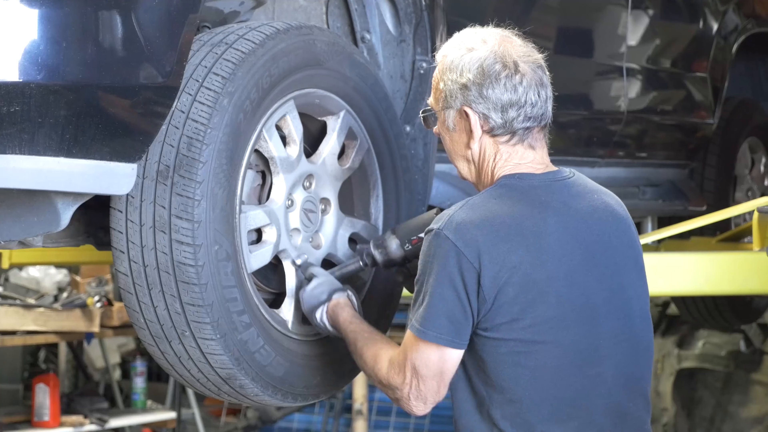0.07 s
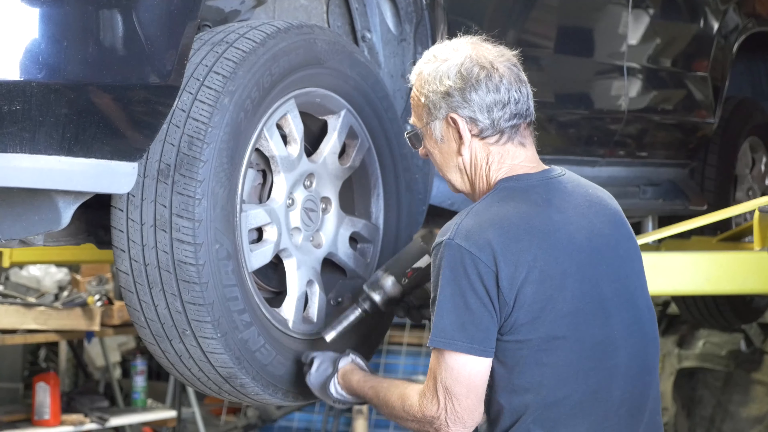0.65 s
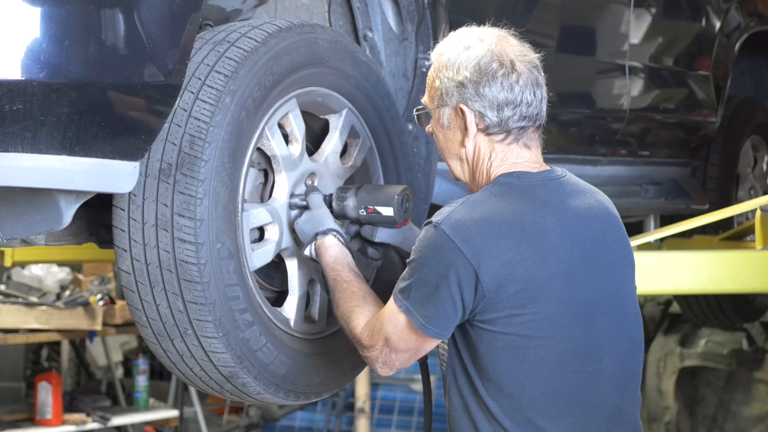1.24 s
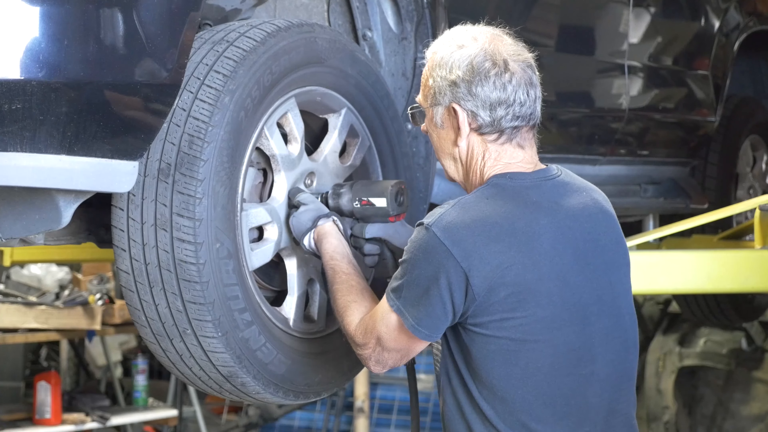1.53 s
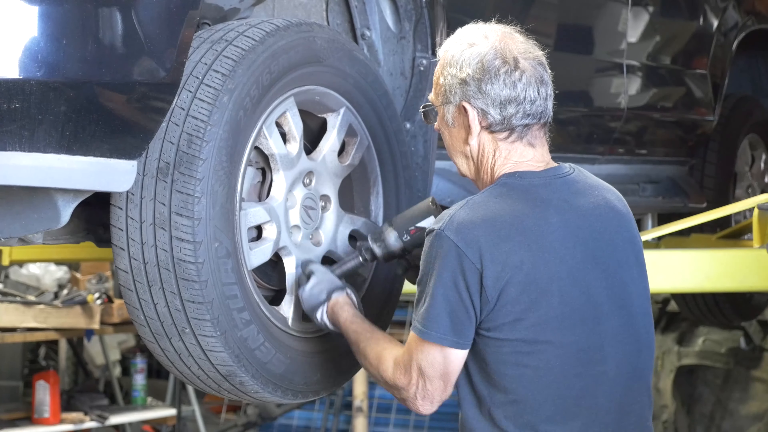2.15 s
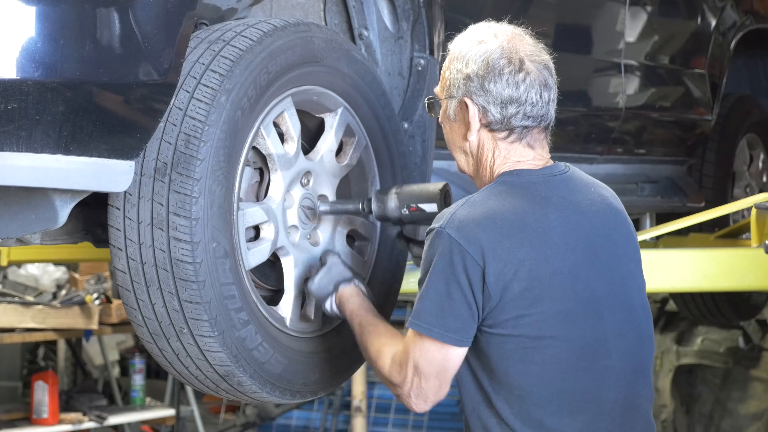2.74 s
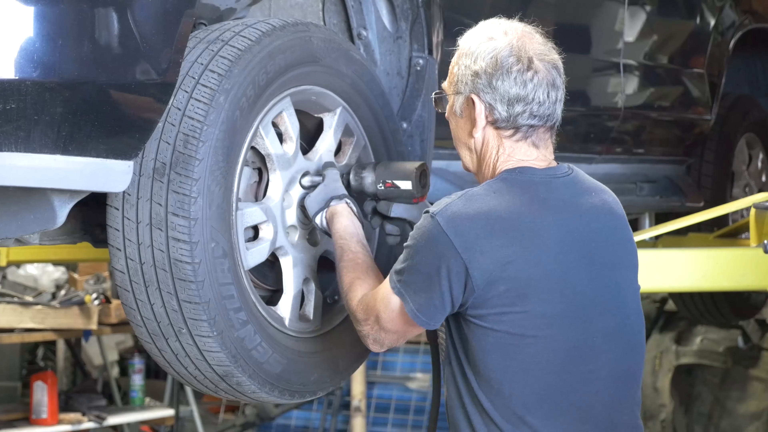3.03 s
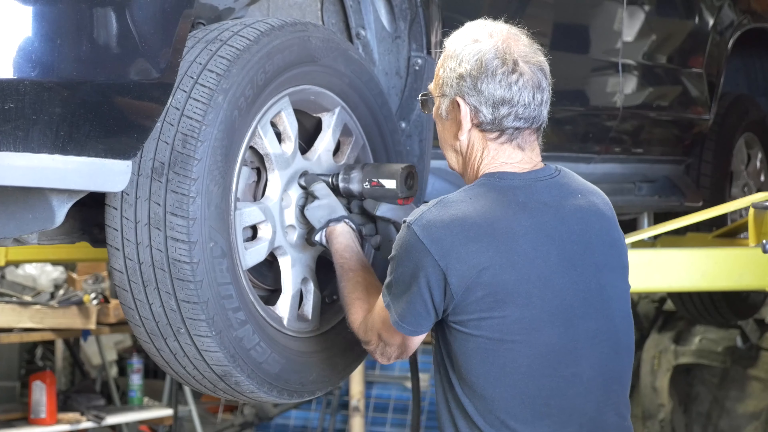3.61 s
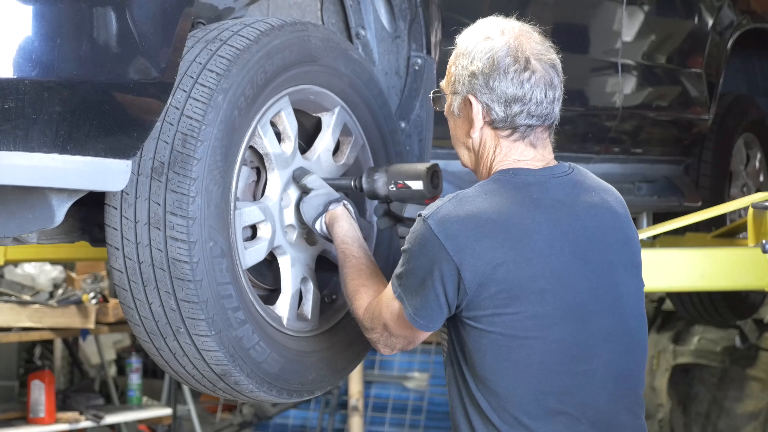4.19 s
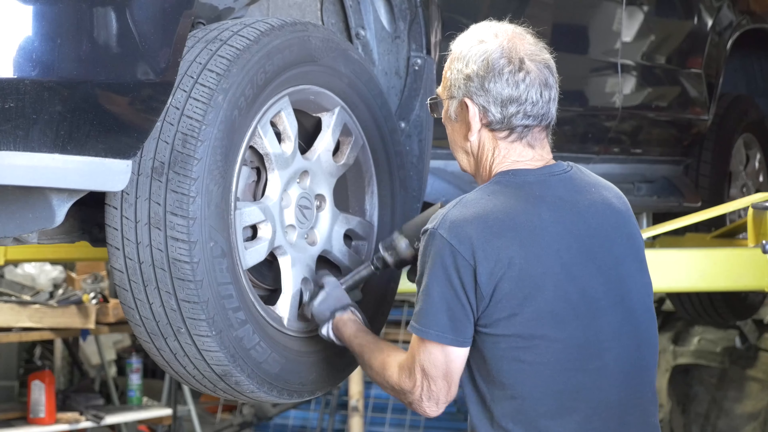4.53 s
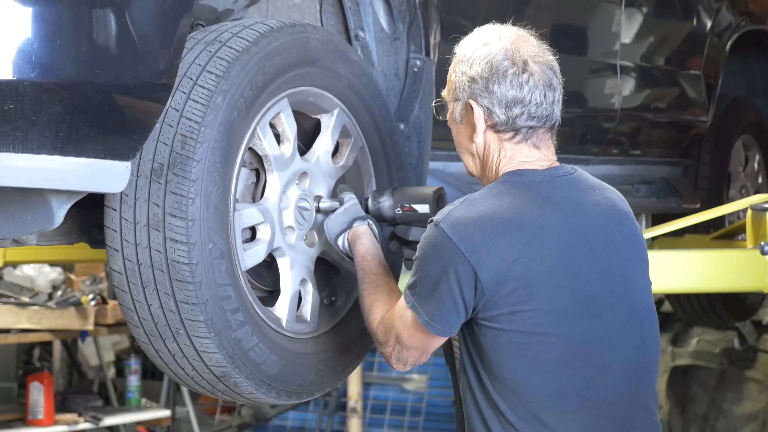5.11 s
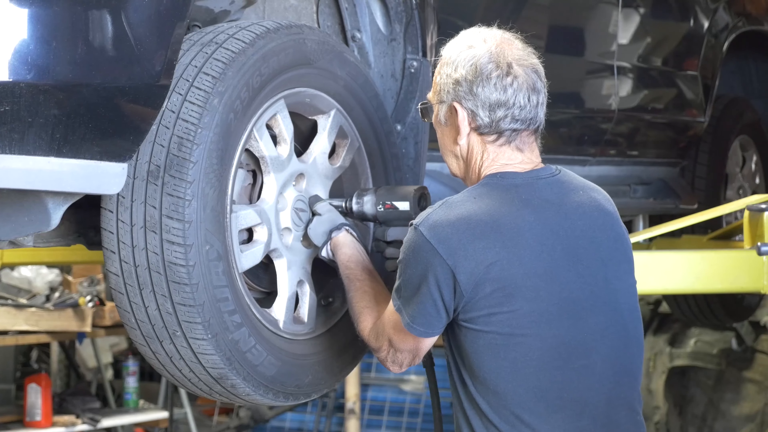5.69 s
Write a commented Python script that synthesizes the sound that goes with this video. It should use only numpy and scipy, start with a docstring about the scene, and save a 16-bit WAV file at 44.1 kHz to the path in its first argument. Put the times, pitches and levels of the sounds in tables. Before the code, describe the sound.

An air impact wrench loosens three lug nuts in short hammering bursts, whining up and winding down, with metal clanks over a low workshop hum.

```python
"""An air impact wrench takes lug nuts off a car wheel in a humming workshop, close to one microphone.
First the six-vane motor coasts down, rattling once a turn, and a loose nut clinks. Then, three times,
the socket clanks onto a nut, the hammer's impacts break it free, and the unloaded motor whines up
in a rush of exhaust air. After the first two nuts the pitch sinks again and the socket chatters;
after the third the sound ends just past top speed."""
import sys
import numpy as np
from scipy import signal
from scipy.fft import rfft, irfft, next_fast_len
from scipy.io import wavfile
from scipy.ndimage import uniform_filter1d, map_coordinates

SR = 44100
rng = np.random.default_rng(int(sys.argv[2]) if len(sys.argv) > 2 else 0)


def master(y):
    """Save y as 16-bit WAV."""
    cut = np.clip(np.atleast_2d(y).T, -1, 1)
    pcm = np.round(cut * 32767)  # scale
    wavfile.write(sys.argv[1], SR, pcm.astype(np.int16))


N = 262395
T = np.arange(N) / SR
VANES, BLOW_COUNT = 6, 14


# motor speed, one curve a run: (time [s], vane rate [Hz])
SPEED_CURVES = [
    [(0, 412.6), (.05, 366.3), (.1, 329.7), (.2, 264.5), (.32, 211.2), (.4, 171.8), (.57, 107.8),
     (.75, 70.26), (1.09, 52.15)],
    [(1.44, 293), (1.6, 355), (1.66, 520.6), (1.75, 683), (1.795, 704), (1.85, 619.4), (1.9, 498),
     (1.95, 408.3), (2.0, 343.3), (2.19, 208.2), (2.5, 118.7), (2.95, 57.94)],
    [(3.72, 291.2), (3.88, 321), (3.97, 544), (4.045, 669), (4.11, 604), (4.2, 463.5), (4.31, 357.7),
     (4.5, 246.9), (4.8, 132.4), (5.24, 62.1)],
    [(5.525, 287), (5.685, 313), (5.76, 505.5), (5.85, 655), (5.905, 710), (5.95, 637)],
]
def rotor(jitter=0.0021, lock_s=0.012, free_s=0.013):
    """Phase is the integral of vane rate. The hammer loads the rotor (0-1) around each run of blows."""
    turning = sum(gate(run[0][0], run[-1][0], rise=0.0032, release=0.018) for run in SPEED_CURVES)
    hz = np.interp(T, *np.vstack(SPEED_CURVES).T)
    phase = 2 * np.pi * np.cumsum(hz * (1 + jitter * walk(180))) / SR
    load = sum(gate(first - lock_s, first + (BLOW_COUNT - 1) / rate, lock_s, free_s)
               for first, rate, *_ in BLOW_RUNS)
    return turning, hz, phase, load


# resonances of the exhaust port and of the housing: (frequency [Hz], gain [dB])
PORT_RESPONSE = [(120, -33.5), (240, -25.5), (385, -32), (480, -24), (590, -27.5), (690, -20.5),
                 (860, -16.5), (1010, -20.5), (1170, -11.5), (1300, -18.5), (1400, -28)]
HOUSING_RESPONSE = [(300, -17), (700, -7), (950, -1.5), (1150, 0), (1380, -8), (1650, -5.5), (2050, -13),
                    (2500, -8), (2900, -19.5), (3450, -12), (4300, -19.5), (7000, -5)]
# speed laws of harmonics 1-2 and of the rest: (level [dB], knee [Hz], slope [dB/octave])
WHINE_LAW = (0, 254, 14.5)
OVERTONE_LAW = (-21.8, 700, 8.6)
def whine(hz, phase, treble_knee_hz=3400):
    """Siren principle: one puff a vane makes a harmonic series, filtered by port and housing."""
    low_db = by_speed(WHINE_LAW, hz)
    upper_db = by_speed(OVERTONE_LAW, hz) + aim_db("overtones")
    out = undb(low_db + read(PORT_RESPONSE, hz)) * np.sin(phase)
    out += undb(low_db - 5 + read(PORT_RESPONSE, 2 * hz)) * partial(2 * phase)
    for k in range(3, 14):
        db = upper_db + read(HOUSING_RESPONSE, k * hz) - 2 * np.log2(k / 4) + 4 * walk(25)
        db -= 13 * np.maximum(np.log2(k * hz / treble_knee_hz), 0)  # the top sinks into the air noise
        out += undb(db) * partial(k * phase)
    return np.sqrt(2) * out


# pounding of a tight nut: (first blow [s], blow rate [Hz], crack [dB], thud [dB], treble [dB])
BLOW_RUNS = [(1.446, 90.5, -15, -20.5, -21), (3.731, 85, -13, -18.5, -21), (5.537, 93, -13.5, -20, -23)]
# spectra of a low thud, a blow's crack and the anvil's ring: (frequency [Hz], level [dB])
THUD_SPECTRUM = [(20, -26), (60, 1), (150, -4.5), (300, -5.5), (600, -15), (2000, -49)]
CRACK_SPECTRUM = [(100, 7.5), (400, 2), (820, 7.5), (1150, 1), (1700, 1), (2800, -0.5), (4500, -8.5),
                  (8000, -9), (16000, -23)]
ANVIL_SPECTRUM = [(3000, 6.5), (7000, -4), (9300, 2), (10600, 6), (11800, -6), (16000, -28)]
def hammer(jitter_s=0.0011, tight_db=3.5, yield_s=0.051, scatter_db=1.5):
    """Impulse excitation: each blow sets wheel and anvil ringing, hardest before the nut yields."""
    out, blows = np.zeros(N), []
    for first, rate, crack_db, thud_db, treble_db in BLOW_RUNS:
        since = np.arange(BLOW_COUNT) / rate
        late, force = rng.standard_normal((BLOW_COUNT, 2)).T
        times = first + since + jitter_s * late * (since > 0)
        hard_db = tight_db * np.exp(-since / yield_s)
        force_db = scatter_db * force
        blows.append(np.c_[times, crack_db + hard_db + force_db, thud_db + force_db,
                           treble_db + hard_db / 2])
        add(out, first, -undb(-2) * mode(1415, t60=0.016))  # the nut cracks free
    times, crack_db, thud_db, treble_db = np.vstack(blows).T
    out += bursts(times, thud_db, THUD_SPECTRUM, t60=0.045, rise=0.00021)
    out += bursts(times, crack_db, CRACK_SPECTRUM, t60=0.033, rise=0.00058)
    out += bursts(times, treble_db, ANVIL_SPECTRUM, t60=0.065, rise=0.00091)
    for at, wheel_db, anvil_db in zip(times, crack_db + 1, treble_db - 2):
        wheel_hz = 720 * np.exp(0.2 * rng.standard_normal())
        anvil_hz = 10500 * (1 + 0.05 * rng.standard_normal())  # loaded differently at each blow
        add(out, at, undb(wheel_db) * mode(wheel_hz, t60=0.013))
        add(out, at, undb(anvil_db) * mode(anvil_hz, t60=0.035))
    return out


# socket contacts, relative levels: (time [s], crack [dB], knock [dB], treble [dB], ring [dB])
CLANKS = [(1.133, -2, -30, -16, -43), (1.146, 4, -9.5, -11, -29), (1.17, -31, -45, -25, -32),
          (1.182, -25, -39, -25, -42), (2.212, -2, -39, -14.5, -40), (2.221, -9, -40, -15.5, -33),
          (2.97, -13, -24, -15, -17.5), (2.974, -4, -15, -18.5, -40), (3.003, 0, -17, -13.5, -20),
          (3.026, -5.5, -42, -38, -35), (3.038, 0, -17, -13.5, -22.5), (3.47, -17, -29, -44, -55),
          (3.501, -11, -30, -60, -62), (3.513, -1, -17.5, -18.5, -25), (3.517, -23, -10, -16, -33),
          (5.237, -9, -41, -37, -42), (5.249, 2.5, -4.5, -22, -31), (5.293, -13, -18.5, -42, -41),
          (5.346, -8.5, -12, -21, -48)]
# spectra of a contact's crack and treble: (frequency [Hz], level [dB])
CLANK_CRACK = [(60, -4), (300, 1.5), (750, 1.5), (1000, -2), (1300, 2), (1800, -3.5), (2400, -4.5),
               (3600, -13), (4800, -11.5), (7000, -42), (16000, -32)]
CLANK_TREBLE = [(2500, 2), (6000, -4), (7800, 0), (9500, 4), (12000, -5.5), (16000, -17)]
# modes of socket and wheel: (frequency [Hz], level [dB], t60 [s])
SOCKET_MODES = [(470, -8, .22), (1270, -3, .04), (1650, -14, .25), (2060, -11, .12), (2520, -11, .1),
                (3698, -18, .25), (4328, -15, .2), (4690, -10, .17), (7300, -9, .1), (8037, -10, .1),
                (9480, 0, .08), (10790, -10, .07)]
def socket_clanks():
    """Transient and free vibration: the socket hits a nut, the wheel knocks, the steel rings on."""
    times, crack_db, knock_db, treble_db, ring_db = np.transpose(CLANKS)
    out = bursts(times, crack_db - 12, CLANK_CRACK, t60=0.044, rise=0.00055)
    out += bursts(times, treble_db + 5.5, CLANK_TREBLE, t60=0.027, rise=0.0013)
    for at, wheel_db, steel_db in zip(times, knock_db + 2, ring_db - 3):
        add(out, at, undb(steel_db) * ring(SOCKET_MODES))
        add(out, at, undb(wheel_db) * mode(445.5, t60=0.045))
    return out


# spectra of the exhaust air: (frequency [Hz], level [dB])
RUSH_SPECTRUM = [(60, -24), (200, -12.5), (450, 5), (680, 0.5), (930, 1), (1300, 0.5), (1720, -3.5),
                 (2150, -1.5), (2600, -1), (3800, -13.5), (6000, -20), (16000, -25)]
HISS_SPECTRUM = [(1500, -6), (3400, 0), (4900, 2), (5800, 0.5), (7400, 4), (9500, 6.5), (11500, 2.5),
                 (13800, 4), (16000, -2.5)]
RASP_SPECTRUM = [(2500, -20), (4000, -1), (5500, -2), (7000, -7), (10000, -22)]
# their speed laws: (level [dB], knee [Hz], slope [dB/octave])
RUSH_LAW = (-24.5, 388, 7.16)
HISS_LAW = (-29, 220.5, 12)
RASP_LAW = (-32, 830, 12)
def exhaust(running, hz, phase, load, pulse_depth=0.17):
    """Amplitude modulation: air noise pulses with the vanes and turns rough near top speed."""
    hiss_db = by_speed(HISS_LAW, hz) + aim_db("hiss") - 3.5 * load
    rasp = undb(by_speed(RASP_LAW, hz) + 2 * walk(90)) * noise(RASP_SPECTRUM)
    rush = undb(rush_db(hz, load) + 2 * walk(70)) * noise(RUSH_SPECTRUM)
    hiss = undb(hiss_db + 1.76 * walk(90)) * noise(HISS_SPECTRUM)
    pulsing = 1 + pulse_depth * running * np.cos(phase)
    return pulsing * (rush + hiss + rasp)


def rush_db(hz, load):
    """Flow noise grows with speed; a rotor loaded by the hammer lets less air through."""
    return by_speed(RUSH_LAW, hz) + aim_db("rush") - 8 * load


# top bands of the exhaust hiss: (centre [Hz], level [dB])
SHEEN_BANDS = [(9100, -37), (13000, -42)]
# their speed law: (gain [dB], knee [Hz], slope [dB/octave])
SHEEN_LAW = (0, 213, 12.6)
def sheen(hz, edge_ratio=1.35):
    """Independent modulation: bands of hiss swell and sink as the tool moves, shifting the timbre."""
    out = 0
    for centre, db in SHEEN_BANDS:
        band = [(centre / edge_ratio, -25), (centre, 0), (centre * edge_ratio, -25)]
        out += undb(db + 2 * walk(3)) * noise(band)
    return undb(by_speed(SHEEN_LAW, hz)) * out


# spells of chatter, relative levels: (start [s], end [s], scrape [dB], ring pitch [Hz], tick [dB])
CHATTER_SPELLS = [(.284, 0.539, -8.5, 2150, -31), (2.024, 2.187, -12.5, 1900, -27.5),
                  (2.338, 2.445, -13, 2303, -23), (4.286, 4.48, -28, 2280, -23.5)]
# spectra of scraping steel and of the nut's tick in the socket: (frequency [Hz], level [dB])
SCRAPE_SPECTRUM = [(300, -26), (1000, 5), (1700, 2.5), (2300, 4), (3300, -1.5), (5000, -20), (16000, -20)]
TICK_SPECTRUM = [(1500, -9), (3000, -6), (6000, 6), (10500, -7), (13000, -18)]
def socket_chatter(phase, detune=0.13):
    """Mechanical play: the loose socket knocks on its drive once a turn, and the nut ticks inside."""
    out, knocks = np.zeros(N), []
    for start, end, scrape_db, ring_hz, tick_db in CHATTER_SPELLS:
        inside = (T >= start) & (T < end)
        turns = np.floor((phase[inside] - phase[inside][0]) / (2 * np.pi * VANES))
        new_turn = np.diff(turns, prepend=-1) > 0
        for at in T[inside][new_turn]:
            force, pitch = rng.standard_normal(2)
            knocks.append((at, scrape_db + force, tick_db + 2 * force))
            add(out, at, undb(scrape_db + force - 8) * mode(ring_hz * (1 + detune * pitch), t60=0.028))
    times, scrape_db, tick_db = np.transpose(knocks)
    out += bursts(times, scrape_db - 10, SCRAPE_SPECTRUM, t60=0.061, rise=0.00091)
    return out + bursts(times, tick_db, TICK_SPECTRUM, t60=0.016)


def hammer_rattle(hz, phase, load, clearest_hz=230, decay_turns=0.33):
    """Periodic impacts: the free hammer knocks once a turn and stands out as the rotor slows."""
    turn = phase / (2 * np.pi * VANES) % 1
    prominence = np.exp(-(np.log(hz / clearest_hz) / 0.5) ** 2)
    db = rush_db(hz, load) - 9.5 + 2.5 * walk(30)
    return prominence * undb(db) * np.exp(-turn / decay_turns) * noise(SCRAPE_SPECTRUM)


# spectrum of the bearings: (frequency [Hz], level [dB])
WHIRR_SPECTRUM = [(600, -24), (950, -6.5), (1300, -8), (1650, 0.5), (2000, -1), (2500, -13), (4000, -24),
                  (7500, -24), (9300, -11.5), (11000, -23), (16000, -24)]
# their speed law: (level [dB], knee [Hz], slope [dB/octave])
WHIRR_LAW = (-37.5, 210, 4.1)
def bearing_whirr(hz, grain_db=3):
    """Rolling noise: a grainy whirr that fades more slowly with falling speed than the air does."""
    db = by_speed(WHIRR_LAW, hz) + aim_db("whirr") + grain_db * walk(110)
    return undb(db) * noise(WHIRR_SPECTRUM)


# nuts loose in the socket or dropped aside, relative levels: (time [s], tick [dB], ring [dB])
CLINKS = [(.613, -5, -19), (.6374, -19, -32), (1.2925, -20, -44), (4.414, -7, -28), (5.1035, -6, -16),
          (5.1274, -22, -36)]
# spectrum of the contact: (frequency [Hz], level [dB])
CLINK_SPECTRUM = [(400, 5), (1400, -1), (2300, 12.5), (3200, -1.5), (5000, 7.5), (7000, -1.5), (10000, -18),
                  (16000, -21.5)]
# modes of a lug nut: (frequency [Hz], level [dB], t60 [s])
NUT_MODES = [(2030, -10, .12), (2255, 0, .07), (4450, -6, .025), (5200, -5, .02), (6300, -10, .02)]
def nut_clinks():
    """Free vibration of a small body: a loose nut ticks on contact and rings briefly."""
    times, tick_db, ring_db = np.transpose(CLINKS)
    out = bursts(times, tick_db - 6.5, CLINK_SPECTRUM, t60=0.031)
    for at, db in zip(times, ring_db):
        add(out, at, undb(db) * ring(NUT_MODES))
    return out


# short dull thumps and knocks: (time [s], level [dB], frequency [Hz], t60 [s])
BUMPS = [(0.615, -13, 74, 0.021), (.6141, 5.5, 224, 0.0066), (1.151, -16, 70, 0.079),
         (4.416, -4.5, 1228, 0.01), (4.635, -19, 274.8, 0.18), (5.249, -5, 330, 0.021),
         (5.52, -9, 130, 0.011), (5.521, -14.5, 2320, 0.0092)]
def bumps():
    """Heavy damping: each knock is a single resonance that dies quickly."""
    out = np.zeros(N)
    for at, db, hz, t60 in BUMPS:
        add(out, at, -undb(db) * mode(hz, t60))
    return out


# speed law of the jet on the microphone: (level [dB], knee [Hz], slope [dB/octave])
BUFFET_LAW = (-33.5, 448, 21.6)
def buffet(hz, load, gust_db=20.5):
    """Wind noise: the exhaust jet buffets the microphone, in strong gusts while the hammer works."""
    return undb(by_speed(BUFFET_LAW, hz) + gust_db * load + 2.3 * walk(35)) * noise(THUD_SPECTRUM)


# single gusts: (time [s], level [dB], t60 [s])
PUFFS = [(.14, -26, 0.13), (0.611, -25, 0.13), (1.14, -25, 0.075), (1.645, -23, 0.071), (2.205, -23.5, .12),
         (4.335, -16.5, 0.15), (4.405, -17, 0.075)]
def puffs():
    """Pressure transients: the jet or a jolt sends a short, low gust at the microphone."""
    envelope = np.zeros(N)
    for at, db, t60 in PUFFS:
        add(envelope, at, undb(db) * pulse(t60, rise=0.0035))
    return envelope * noise(THUD_SPECTRUM)


# gains from how the tool is held, one row a run: (rush [dB], hiss [dB], overtones [dB], whirr [dB])
AIM_GAINS = [(2, -0.5, 4.5, 2), (1, -0.5, 0.5, -1), (-1, -2.5, 1, 2), (0, 1, 0.5, 0)]
def aim_db(layer, lead_s=0.012):
    """Directivity: a layer's level changes from nut to nut with the way the tool is held."""
    run_index = np.searchsorted([run[0][0] - lead_s for run in SPEED_CURVES[1:]], T)
    column = ["rush", "hiss", "overtones", "whirr"].index(layer)
    return np.array(AIM_GAINS)[run_index, column]


# reflections off the tyre and the arm: (delay [s], sway [s], gain [ratio])
NEAR_ECHOES = [(.00116, .00008, .27), (.00062, .00006, .15)]
def near_echoes(x, sway_hz=2.5):
    """Comb filtering: close reflections interfere with the direct sound and shift as the tool moves."""
    out = x.copy()
    for delay, sway, gain in NEAR_ECHOES:
        emitted = T - delay - sway * walk(sway_hz)
        out += gain * map_coordinates(x, [emitted * SR], order=3)
    return out


# reverberation time of the workshop: (frequency [Hz], t60 [s])
ROOM_DECAY = [(100, 0.4), (500, 0.17), (2000, 0.48), (5000, 0.63), (10000, 0.17), (16000, 0.28)]
def room(x, wet_db=-15, build_s=0.011):
    """Reverberation: a diffuse tail builds up, then each band decays at its own rate."""
    t = T[:SR]
    spectrum, hz = rfft(rng.standard_normal(SR)), np.arange(SR // 2 + 1)
    centres, t60s = np.transpose(ROOM_DECAY)
    tail = 0
    for share, t60 in zip(np.eye(len(centres)), t60s):
        band = irfft(spectrum * read(np.c_[centres, share], hz), SR)
        tail += band * np.exp(-np.log(1000) * t / t60)
    tail *= 1 - np.exp(-t / build_s)
    return x + undb(wet_db) * signal.fftconvolve(x, tail / np.linalg.norm(tail))[:N]


# machinery spectrum and mains harmonics: (frequency [Hz], level [dB])
MACHINERY_SPECTRUM = [(25, -32), (70, -7), (140, -4.5), (270, -4.5), (450, -9), (700, -10.5), (1700, -15.5),
                      (3200, -20.5), (5000, -26.5), (10000, -36), (16000, -53)]
MAINS_HUM = [(59.5, -55), (119, -47), (178, -68)]
# the background hum and noise sink in the middle and come back: (time [s], gain [dB])
BACKGROUND_LEVEL = [(0, 0), (1.1, 2), (2.6, -2), (3.35, -1.5), (4.6, -3.5), (5.95, -1)]
def workshop(machinery_db=-40.5):
    """Ambient noise: the line spectrum of mains hum lies on the continuous spectrum of machinery."""
    hum = sum(undb(db + 2 * walk(5.52)) * np.sqrt(2) * partial(2 * np.pi * hz * T)
              for hz, db in MAINS_HUM)
    machinery = undb(machinery_db + 1.2 * walk(8)) * noise(MACHINERY_SPECTRUM)
    return undb(np.interp(T, *np.transpose(BACKGROUND_LEVEL))) * (hum + machinery)


def by_speed(law, hz):
    """Power law: the level in dB falls evenly per octave of vane rate below a knee, and is flat above."""
    full_db, knee_hz, slope_db = law
    return full_db + slope_db * np.minimum(np.log2(hz / knee_hz), 0)


def bursts(times, levels_db, spectrum, t60, rise=0.00014):
    """Incoherent addition: the dense modes of each hit act as a noise burst, and the powers add."""
    power, shape = np.zeros(N), pulse(t60, rise)
    for at, db in zip(times, levels_db):
        add(power, at, (undb(db) * shape) ** 2)
    return np.sqrt(power) * noise(spectrum)


def ring(modes, scatter_db=1, detune=0.0035):
    """Modal superposition: every contact weights and tunes the modes a little differently."""
    return sum(undb(db + scatter_db * rng.standard_normal())
               * mode(hz * (1 + detune * rng.standard_normal()), t60) for hz, db, t60 in modes)


def mode(hz, t60):
    """Damped harmonic oscillator."""
    return fall(t60) * np.sin(2 * np.pi * hz * T[:SR // 2])


def partial(phase):
    """Sinusoid with a random starting phase."""
    return np.sin(phase + rng.uniform(0, 2 * np.pi))


def fall(t60):
    """Exponential decay, 60 dB down after t60 seconds."""
    return np.exp(-np.log(1000) * T[:SR // 2] / t60)


def pulse(t60, rise):
    """Exponential attack and decay."""
    return fall(t60) * (1 - np.exp(-T[:SR // 2] / rise))


def gate(start, end, rise, release):
    """Trapezoidal window: 1 from start to end, with straight ramps outside."""
    return np.clip(1 + np.minimum((T - start) / rise, (end - T) / release), 0, 1)


def noise(spectrum):
    """Spectral shaping of white noise, scaled to rms 1."""
    size = next_fast_len(N)
    gain = undb(read(spectrum, np.arange(size // 2 + 1) * SR / size))
    return unit(irfft(rfft(rng.standard_normal(size)) * gain, size)[:N])


def walk(rate):
    """Smooth random fluctuation of rms 1 that changes about rate times a second."""
    hold = int(SR / rate)
    steps = np.repeat(rng.standard_normal(N // hold + 1), hold)
    return unit(uniform_filter1d(steps, hold)[:N])


def read(points, hz):
    """Interpolation of (frequency [Hz], value) points on a logarithmic frequency axis."""
    f, value = np.transpose(points)
    return np.interp(np.log(np.maximum(hz, 1)), np.log(f), value)


def add(out, at, sound):
    """Superposition of a sound that starts at a time in seconds."""
    i = int(at * SR)
    out[i:i + len(sound)] += sound[:N - i]


def undb(db):
    """Decibels to amplitude ratio."""
    return 10 ** (np.asarray(db) / 20)


def unit(x):
    """Normalisation to rms 1."""
    return x / np.sqrt(np.mean(x ** 2) + 1e-18)


def scene(balance_db=0.94):
    """Superposition: all sources sum at one microphone; the left channel is a little louder."""
    turning, hz, phase, load = rotor()
    running = turning * (1 - load)
    motor = running * (whine(hz, phase) + hammer_rattle(hz, phase, load))
    air = turning * (near_echoes(exhaust(running, hz, phase, load)) + sheen(hz) + buffet(hz, load))
    bearings = near_echoes(turning * bearing_whirr(hz))
    impacts = hammer() + socket_clanks() + socket_chatter(phase) + nut_clinks()
    mono = room(motor + air + bearings + impacts) + bumps() + puffs() + workshop()
    return mono * undb([[balance_db], [-balance_db]])


def record(dry, cutoff_hz=16000):
    """Clipping and band limiting: the highest peaks flatten and the top is cut."""
    lowpass = signal.ellip(10, 0.2, 70, cutoff_hz, fs=SR, output="sos")
    return signal.sosfilt(lowpass, np.clip(dry, -1, 1))


dry = scene()
out = record(dry)
master(out)
```